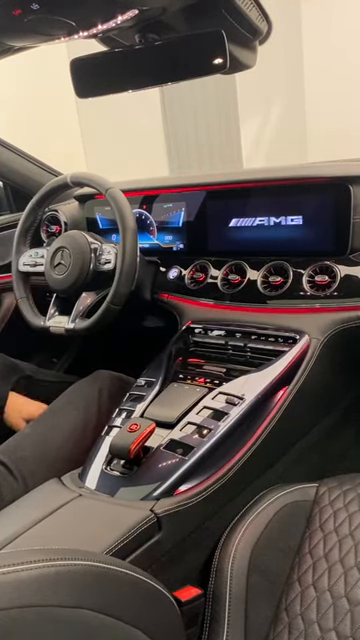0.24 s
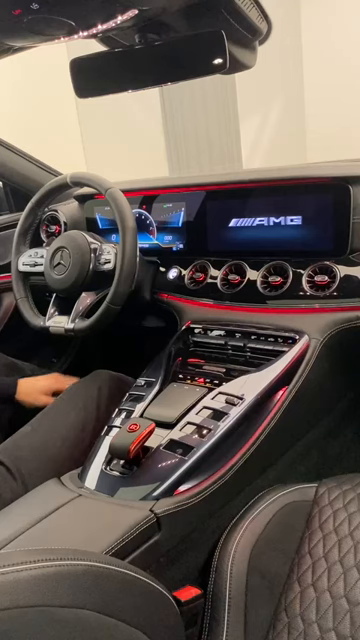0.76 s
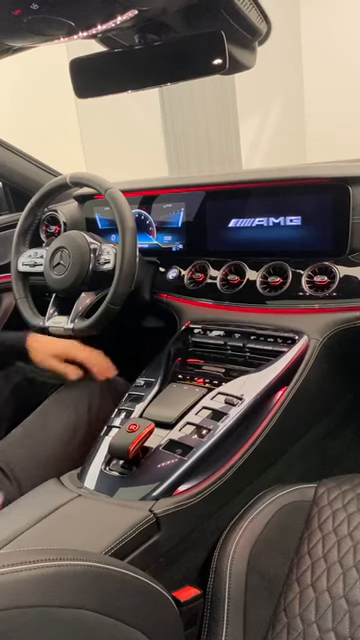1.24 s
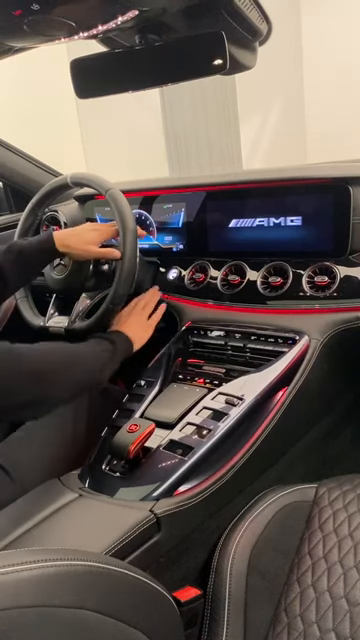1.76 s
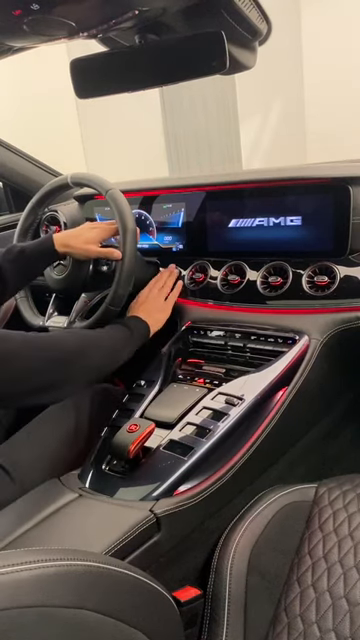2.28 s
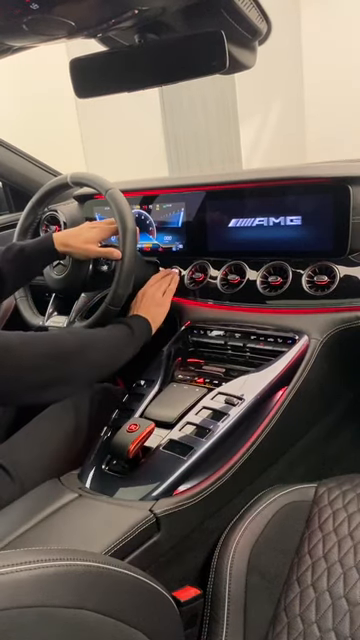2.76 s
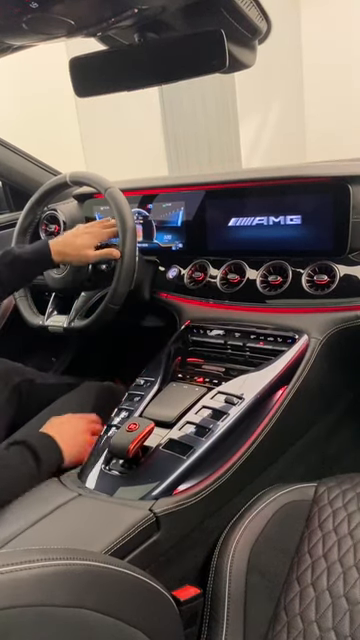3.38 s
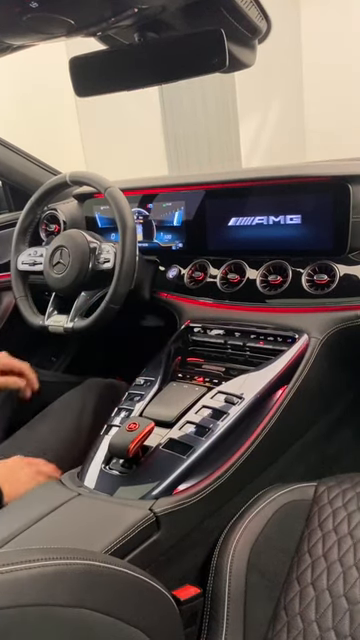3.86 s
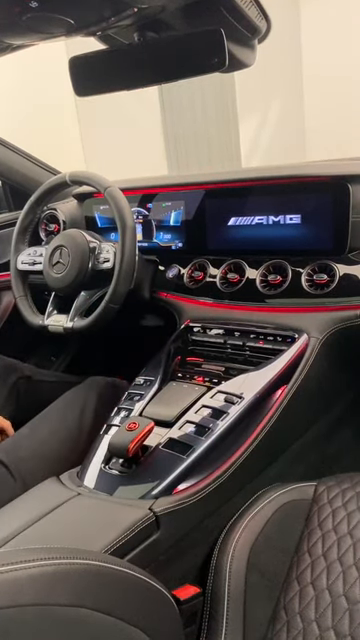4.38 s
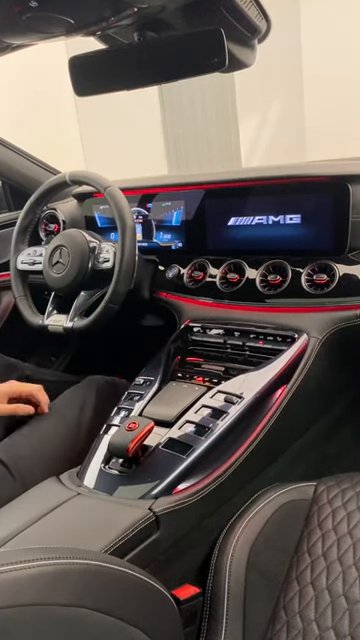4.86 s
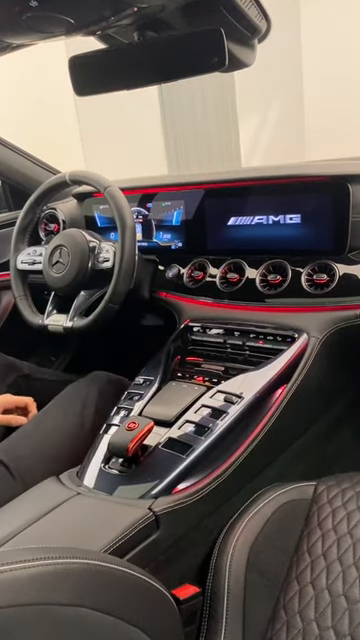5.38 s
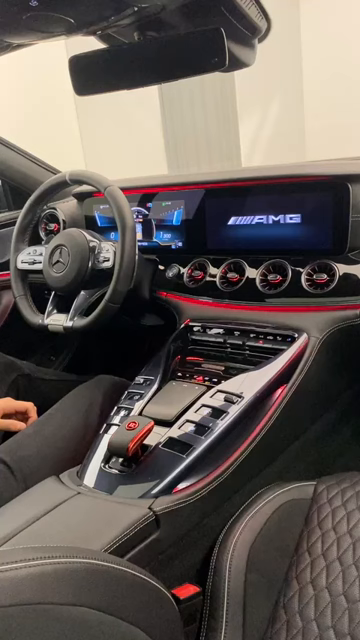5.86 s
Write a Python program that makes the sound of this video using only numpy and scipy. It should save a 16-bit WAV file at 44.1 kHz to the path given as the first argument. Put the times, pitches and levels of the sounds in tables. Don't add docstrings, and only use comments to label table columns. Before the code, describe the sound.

A close stereo microphone in a small, dry, padded car interior hears the driver shifting on leather, a heavy door closing with a low pressure thump, and several crisp clicks. After a short labouring starter, a big engine bursts to life, its revs leaping and lumpy with booming exhaust pulses, before sinking to a smooth, bass-heavy drone that continues to the end.

```python
import sys
import numpy as np
from scipy import signal
from scipy.fft import rfft, irfft, next_fast_len
from scipy.io import wavfile
from scipy.ndimage import uniform_filter1d

SR = 44100
rng = np.random.default_rng(int(sys.argv[2]) if len(sys.argv) > 2 else 0)


def boost(x):
    u = np.asarray(x, float) / 20
    return 10 ** u


def pcm_store(signal):
    levels = np.round(np.clip(np.atleast_2d(signal), -1, 1) * 32767)
    wavfile.write(sys.argv[1], SR, levels.astype(np.int16).T)


N = 270333
TIME = np.arange(N) / SR

EDGES = 24 * 2 ** np.arange(0, 9.1, 1 / 3)
CENTRES = np.sqrt(EDGES[1:] * EDGES[:-1])
# [t/s, even part level/dB, uneven part level/dB]
COMBUSTION = [(3.2, -36.5, -53), (3.3, -50.5, -42), (3.38, -13.5, -25.5), (3.45, -27, -32.5),
              (3.495, -18, -34), (3.6, -30, -36), (3.68, -36, -37.5), (3.72, -26, -38), (3.85, -41, -36.5),
              (3.91, -26.5, -32), (4.04, -37, -29), (4.12, -19, -25), (4.165, -33, -33.5),
              (4.22, -25, -34.5), (4.42, -16.5, -31), (4.8, -13, -36), (5.25, -11.5, -36),
              (6.13, -12.5, -45.5)]
# [f/Hz, left-right level/dB]
ENGINE_BALANCE = [(60, 2), (110, 2.5), (190, 6), (350, 6.5), (620, 1.5), (1110, 1.5), (2000, -5),
                  (3580, -0.5), (6420, -4), (11500, 4.5)]


def in_time(rows):
    s, *columns = np.transpose(rows)
    return [np.interp(TIME, s, c) for c in columns]


def at_hz(points, hz):
    table_hz, values = np.transpose(points)
    return np.interp(np.log(hz), np.log(table_hz + 1e-9), values)


def blend(levels_db, where_hz, hz):
    place = np.interp(np.log(hz), np.log(where_hz), np.arange(len(where_hz)))
    k = min(int(place), len(where_hz) - 2)
    return levels_db[k] + (place - k) * (levels_db[k + 1] - levels_db[k])


def relative(levels_db, colour, where_hz, widths_hz):
    return [db - at_hz(colour, hz) - 10 * np.log10(width / (SR / 2))
            for db, hz, width in zip(levels_db, where_hz, widths_hz)]


def together(*levels_db):
    return 10 * np.log10(sum(boost(db) ** 2 for db in levels_db))


def hump(db, start, end, rise, fall):
    return db - rise * np.maximum(start - TIME, 0) - fall * np.maximum(TIME - end, 0)


def drift(rate):
    r = np.exp(-80 * np.pi * rate / SR)
    white = rng.standard_normal(N // 40 + 2002)
    slow = signal.lfilter([1], [1, -2 * r, r * r], white)[2000:]
    return np.interp(np.arange(N) / 40, np.arange(len(slow)), slow / slow.std())


def pan(x, db):
    return np.array([x * boost(db / 2), x * boost(-db / 2)])


def ring(excitation, hz, t60):
    r, w = boost(-60 / (t60 * SR)), 2 * np.pi * hz / SR
    return signal.lfilter([0, np.sin(w)], [1, -2 * r * np.cos(w), r * r], excitation + 1e-18)


def shaped(x, response):
    size = next_fast_len(N + SR // 4)
    hz = np.arange(1, size // 2 + 2) * SR / size
    return irfft(rfft(x, size) * response(hz), size)[..., :N]


def band_noises():
    white = rng.standard_normal((2, 2, N))
    bands = []
    for k in range(len(CENTRES)):
        band = signal.butter(2, EDGES[k:k + 2], "band", fs=SR, output="sos")
        bands.append(signal.sosfilt(band, white[k % 2]))
    return bands


def stereo(pair, likeness, hz):
    alike = np.clip(at_hz(likeness, hz), -.9, .999)
    shared, opposed = pair[0], pair[1] * [[1], [-1]]
    return np.sqrt(1 + alike) * shared + np.sqrt(1 - alike) * opposed


def ring_cabin(rows):
    # [f/Hz, t60/s]
    cabin_modes = [(135, .2), (270, 0.058)]
    out, age = np.zeros((2, N)), np.arange(SR // 2) / SR
    for s, db, boom_hz, upper_db, panel_db, t60 in rows:
        span = slice(int(s * SR), int(s * SR) + len(age))
        for (hz, decay), rel_db in zip([(boom_hz, t60)] + cabin_modes, [0, upper_db, panel_db]):
            attack = 1 - np.exp(-age * hz * 3.9)
            swell = attack * boost(db + rel_db + 1.5 - 60 * age / max(decay, .03))
            out[:, span] += pan(swell * np.sin(2 * np.pi * hz * age), at_hz(ENGINE_BALANCE, hz))
    return out


IDLE_HZ = 80.52


def speed():
    # [t/s, firing rate f/Hz]
    flare = [(3.2, 40.14), (3.3, 45.3), (3.38, 80.56), (3.46, 113.4), (3.52, 145.2), (3.62, 162.7),
             (3.84, 151.9), (3.93, 131.3), (4.07, 117.4), (4.17, 102.9), (4.22, 102.3), (4.28, 97.64)]
    settle_s = .35
    last_s, last_hz = flare[-1]
    settling = IDLE_HZ + (last_hz - IDLE_HZ) * np.exp(-np.maximum(TIME - last_s, 0) / settle_s)
    return np.where(TIME < last_s, in_time(flare)[0], settling)


def firing_tones(phase):
    # [multiple of firing rate, level/dB, wander/dB, left-right/dB, start t/s]
    tied_tones = [
        (1.585, -35.5, 0.5, 5.5, 4.6),
        (2.001, -45, -1, 3, 4.7),
        (2.631, -62.5, -1.5, 3, 5.1),
    ]
    tone_db = in_time(COMBUSTION)[0]
    tone_db = tone_db - 400 * np.clip(COMBUSTION[0][0] - TIME, 0, 1)
    out = pan(np.sqrt(2) * boost(tone_db + .4 * drift(4.3)) * np.sin(phase), 1.9)
    for multiple, level_db, wander_db, pan_db, start in tied_tones:
        swell = np.clip((TIME - start) / 0.04, 0, 1)
        level = swell * boost(level_db + wander_db * drift(2.1))
        out += pan(np.sqrt(2) * level * np.sin(multiple * phase), pan_db)
    return out


def exhaust_thumps():
    # [t/s, peak level/dB, boom f/Hz]
    backfires = [(3.221, -23, 57.03), (3.259, -22.5, 57.24), (3.327, -18.5, 57.67), (3.357, -21, 67.3),
                 (3.407, -16.5, 85.9), (3.469, -15, 80.45), (3.659, -30, 63.7), (3.777, -16, 77.3),
                 (3.821, -12, 62.44), (3.92, -15.5, 56.74), (3.949, -11, 65.8), (4.078, -14.5, 71.86),
                 (4.12, -17.5, 78.6), (4.18, -25, 56.8), (4.097, -25, 141.3), (4.127, -22, 125.3)]
    upper_db, panel_peak_db, t60_s = -12.5, -36.5, .24
    return ring_cabin([(s, db, hz, upper_db, panel_peak_db - db, t60_s) for s, db, hz in backfires])


def running_levels(firing_hz):
    octaves = np.log2(firing_hz / IDLE_HZ)
    pull = uniform_filter1d(np.maximum(np.gradient(octaves) * SR, 0), size=SR // 20)
    load_db = 0.98 * pull
    shake_db = in_time(COMBUSTION)[1]
    growl_db = -49 + 13 * octaves + load_db + .2 * (shake_db + 40)
    clatter_db = -59.5 + 9 * octaves + load_db
    hiss_db = hump(-65.5, 0, 3.8, 0, 9)
    puff_db = hump(-65.5, 4.5, 4.5, 61.5, 61.5)
    catch_db = hump(0, 3.33, TIME[-1], 150, 0)
    return [db + catch_db for db in (shake_db, growl_db, clatter_db, together(hiss_db, puff_db))]


def starter_levels():
    # [t/s, level/dB]
    effort = [
        (2.67, -32.5),
        (2.74, -2.5),
        (2.9, -10),
        (3.16, -2),
        (3.3, 1.5),
        (3.45, -22),
    ]
    base_db = [-49.5, -49.5, -62.5, -66]
    follows = [1.8, .6, .4, 1.1]
    effort_db = in_time(effort)[0]
    turning_db = hump(0, effort[0][0], effort[-1][0], 2000, 2000)
    return [db + share * effort_db + turning_db for db, share in zip(base_db, follows)]


def body_noise(firing_hz, phase, noises):
    # [f/Hz, level/dB per Hz]
    body_colour = [(15, -46), (25, -23), (52, 2), (75, 6), (156, -10.5), (187, -16), (531, -37), (759, -42),
                   (907, -42.5), (1800, -61.5), (5820, -76), (8100, -109), (11000, -104), (14300, -134),
                   (22000, -120)]
    body_hz = [45, 280, 900, 2800]
    # [f/Hz, left-right likeness]
    engine_likeness = [(60, 0.99), (130, 0.89), (270, 0.19), (570, -0.76), (1210, -0.42), (2560, -0.34),
                       (5440, -1.4), (11500, -0.42)]
    levels_db = [together(run_db, start_db)
                 for run_db, start_db in zip(running_levels(firing_hz), starter_levels())]
    levels = relative(levels_db, body_colour, body_hz, [35, 275, 1050, 3500])
    puff, surge, out = np.cos(phase), drift(6.4), 0
    for hz, pair in zip(CENTRES, noises):
        db = at_hz(body_colour, hz) + blend(levels, body_hz, hz) - 3.1
        db += 1.0 * surge + 1.5 * drift(14)
        db -= 13.0 * np.exp(-(np.log2(hz / firing_hz) / .5) ** 2)
        gain = boost(db) * (1 + .3 * puff * (hz > 300))
        out = out + stereo(pair, engine_likeness, hz) * pan(gain, at_hz(ENGINE_BALANCE, hz))
    return out


def singing():
    # [f/Hz, width/Hz, level/dB, from t/s, to t/s]
    resonances = [
        (917, 91, -61, 3.33, 4.1),
        (536, 39, -56.5, 3.5, 4.2),
        (360.6, 30, -57.5, 4.45, 5.3),
        (370.9, 9.1, -50, 5.7, 6.4),
        (438, 66, -60, 5.7, 6.4),
        (237, 30, -42.5, 3.95, 4.35),
        (1110, 85, -69, 0.905, 1.095),
        (1080, 56, -68, 1.123, 1.31),
        (1375, 28, -60, 3.23, 3.42),
        (1560, 130, -57, 2.7, 2.79),
    ]
    out = 0
    for hz, width, db, start, end in resonances:
        t60 = 2.1 / width
        noise = ring(ring(rng.standard_normal(N), hz, t60), hz, t60)
        swell = np.clip(np.minimum(TIME - start, end - TIME) / 0.14, 0, 1)
        out = out + pan(boost(db) * swell * noise / noise.std(), at_hz(ENGINE_BALANCE, hz) + 6.5)
    return out


def body_blows():
    # [t/s, peak level/dB, boom f/Hz, panel level/dB]
    blows = [(0.643, -59, 56.9, -0.5), (0.688, -58.5, 71, -3), (0.739, -54.5, 95, -8), (0.958, -47, 74, -4),
             (1.006, -42.5, 96, -2), (1.186, -35.5, 91.5, -7), (1.202, -42, 94.2, 5),
             (1.227, -32.5, 78, -6), (1.246, -16, 92.4, -17.5), (1.2571, -11, 67.9, -26),
             (1.318, -33, 61.6, -31), (1.363, -35, 59, -38), (1.413, -41.5, 55, -32), (2.004, -62, 81, 4.5),
             (2.122, -56.5, 73, -19), (2.412, -57, 88, 11), (2.739, -41, 86, 0.5), (2.773, -39, 62, -20),
             (2.881, -35.5, 89.4, -2.5)]
    rows = []
    for s, db, hz, panel_db in blows:
        upper_db = -4.5 - .22 * max(db + 46.5, 0)
        t60_s = .21 - .0025 * (db + 45.5)
        rows.append((s, db, hz, upper_db, panel_db, t60_s))
    return ring_cabin(rows)


def switch_clicks():
    # [t/s, peak level/dB, ring f/Hz, thud level/dB, brightness level/dB]
    switches = [(0.279, -63, 684, 6.5, -20), (0.745, -40.5, 715, -14.5, -24),
                (0.7439, -63.5, 2400, -20, 10.5), (1.004, -51, 1060, 7, 1), (1.219, -55.5, 1110, 26.5, 10),
                (1.249, -60, 719, 28, -28), (1.314, -80, 659, 18, -14), (2.004, -55, 1275, 8, -6),
                (2.112, -47, 1480, 3, 1.5), (2.255, -50, 620, -1.5, -1), (2.406, -35.5, 1080, -4.5, -1),
                (2.409, -37.5, 766, -3, -10), (2.877, -27, 1300, -11.5, 3.5)]
    air_db = -15
    return [(s, db, hz, thud_db, bright_db, bright_db + air_db) for s, db, hz, thud_db, bright_db in switches]


def trim_ticks():
    # [t/s, peak level/dB, ring f/Hz, snap level/dB, air level/dB]
    ticks = [(0.015, -65, 2840, 14.5, -10), (0.646, -67, 1470, 16.5, 2), (1.7304, -75.5, 2900, 9, 2),
             (1.7665, -76, 4040, 21, 23), (2.041, -75, 3960, 16, 13), (2.7426, -60.5, 1560, 13, -36.5),
             (2.8345, -46, 2870, -4.5, -10.5), (3.2387, -58, 4000, -0.5, 8), (3.277, -42, 3030, -3.5, -15),
             (4.13, -47, 1520, -5.5, -14.5), (4.4703, -37.5, 1584, -26, -42),
             (5.1704, -50.5, 1493, -19, -32.5)]
    thud_db = -23
    return [(s, db, hz, thud_db, snap_db, air_db) for s, db, hz, snap_db, air_db in ticks]


def clicks(noises):
    click_hz = [280, 1000, 2300, 7000]
    # [f/Hz, radians left leads]
    port_phase = [(60, 0), (520, -.9), (1030, -1.3), (1460, -.1), (2500, .7), (3200, 1.5), (4130, 1),
                  (4900, 3), (5600, 2), (7150, 2.9), (11700, 3.1)]
    t60_s, ring_cycles = 0.06, 24
    age = np.arange(SR // 4) / SR
    shape = boost(-60 * np.maximum(age - .003, 0) / t60_s) * np.minimum(age / 0.00013, 1)
    late = np.minimum(age / 0.00047, 1)
    direct, scattered = np.zeros(N), np.zeros((2, N))
    for s, db, ring_hz, thud_db, snap_db, air_db in switch_clicks() + trim_ticks():
        span = slice(int(s * SR), int(s * SR) + len(age))
        burst_levels = [thud_db + 14.5, 0, snap_db - 3.0, air_db + 11.0]
        for hz, pair in zip(CENTRES, noises):
            band_db = db + blend(burst_levels, click_hz, hz) - 9.9 * max(np.log2(150 / hz), 0)
            band_db += 10.5 * np.exp(-(np.log2(hz / ring_hz) / .4) ** 2) - 7.0
            dying = boost(band_db) * shape ** ((hz / 1000) ** .4) * np.minimum(age * hz / 2.5, 1)
            direct[span] += boost(-0.5) * dying * pair[0, span]
            lingering = np.sqrt(dying * boost(band_db))
            scattered[:, span] += boost(1.0) * lingering * pair[::-1, span] * late
        strike = rng.standard_normal(len(age)) * shape ** 4.8
        knock = ring(strike, ring_hz, ring_cycles / ring_hz)
        knock_db = db + blend([thud_db, 0, snap_db, air_db], click_hz, ring_hz) - 3.5
        direct[span] += boost(knock_db) * knock / abs(knock).max()
    at_ports = shaped(direct, lambda hz: np.exp(.5j * at_hz(port_phase, hz) * [[1], [-1]]))
    return at_ports + scattered


def driver_levels():
    # [t/s, leather level/dB]
    moving = [
        (0.0, -71.5),
        (0.34, -76.5),
        (0.64, -78),
        (1.03, -68.5),
        (1.3, -78.5),
        (1.84, -76.5),
        (2.33, -70.5),
        (2.54, -70),
        (2.68, -77.5),
    ]
    # [t/s, length/s, level/dB]
    sleeves = [(0.0, 0.012, -77.5), (0.675, 0.088, -74), (0.968, .26, -74.5), (1.403, 0.096, -74),
               (2.127, .04, -85.5), (2.73, 0.04, -86), (2.857, 0.02, -73), (3.195, .6, -71.5),
               (4.078, .12, -74.5), (4.649, 0.36, -84), (5.807, .12, -89)]
    leather_db = in_time(moving)[0]
    rumble_db = hump(-49.5, 1.365, 1.365, 51.5, 43.5)
    seat_db = together(-71 + 0.98 * (leather_db + 75), rumble_db)
    swishes = [hump(db, s, s + length, 217, 109) for s, length, db in sleeves]
    still_db = -92.5
    return seat_db, leather_db, together(still_db, *swishes)


def rustle(noises):
    # [f/Hz, level/dB per Hz]
    shift_colour = [(25, -10), (60, -2), (110, -13.5), (150, -16.5), (300, -28.5), (1000, -39), (2800, -52),
                    (5000, -52), (7800, -51.5), (10500, -49), (12000, -63)]
    shift_hz = [90, 600, 2800, 8000]
    # [f/Hz, left-right likeness]
    cabin_likeness = [(60, 1), (130, -0.21), (270, 0.89), (570, -0.21), (1210, -0.55), (2560, 0.96),
                      (5440, 0.4), (11500, -1.3)]
    seat_db, leather_db, swish_db = driver_levels()
    cloth_db = together(swish_db - 0.5, -90.5)
    levels_db = [seat_db, leather_db, cloth_db, swish_db]
    levels = relative(levels_db, shift_colour, shift_hz, [210, 1250, 3500, 4500])
    grain, out = drift(25), 0
    for hz, pair in zip(CENTRES, noises):
        db = at_hz(shift_colour, hz) + blend(levels, shift_hz, hz) + 1.0
        gain = boost(db + 1.3 * grain + 0.76 * drift(12))
        out = out + gain * stereo(pair, cabin_likeness, hz)
    return out


def scene():
    firing_hz = speed()
    phase = 2 * np.pi * np.cumsum(firing_hz) / SR
    phase = phase - phase[-1] - np.pi / 2
    noises = band_noises()
    backwards = [pair[:, ::-1] for pair in noises]
    engine = firing_tones(phase) + exhaust_thumps() + body_noise(firing_hz, phase, noises) + singing()
    return engine + body_blows() + clicks(noises) + rustle(backwards)


def roll_off(x):
    return signal.sosfilt(signal.butter(12, 12120, fs=SR, output="sos"), x)


def record(dry):
    # [f/Hz, level/dB]
    sum_colour = [(20, -12), (45, 0), (1520, 0), (1700, -4), (2250, -3), (2500, 0), (4600, 0), (4750, -10),
                  (5250, -10), (5400, -2), (6400, -3), (6900, -15), (9000, -13), (12000, -18)]
    # [f/Hz, level/dB]
    difference_colour = [(20, 0.5), (1520, -3.5), (1800, -12.5), (2250, -8), (2600, 0), (11000, -4),
                         (11600, -10.5), (12100, -32.5)]
    common = shaped(dry[0] + dry[1], lambda hz: boost(at_hz(sum_colour, hz)) / 2)
    apart = shaped(dry[0] - dry[1], lambda hz: boost(at_hz(difference_colour, hz)) / 2)
    image_hz = 12000
    common = common * (1 + boost(-77.5) * np.cos(2 * np.pi * image_hz * TIME))
    return roll_off(np.array([common + apart, common - apart]))


dry = scene()
out = record(dry)
pcm_store(out)
```